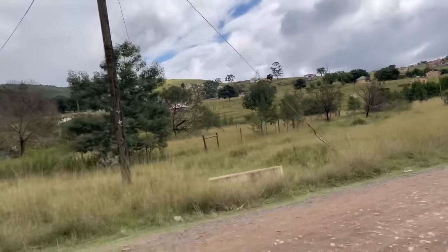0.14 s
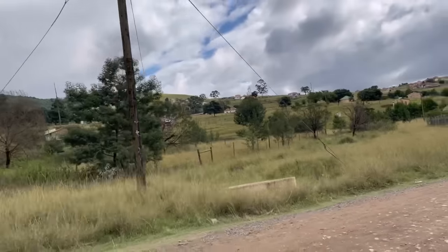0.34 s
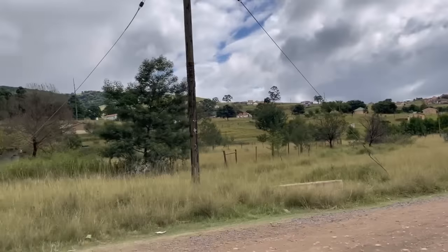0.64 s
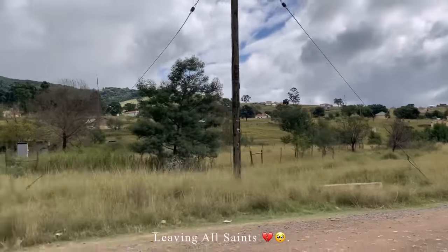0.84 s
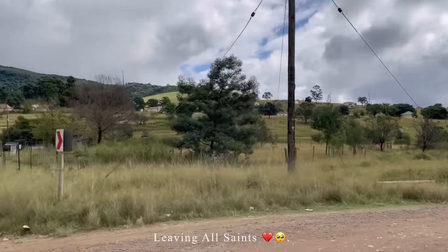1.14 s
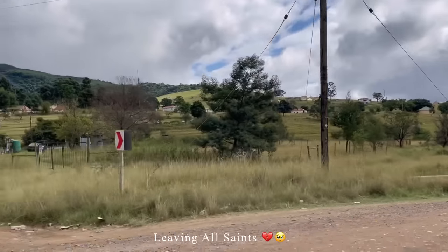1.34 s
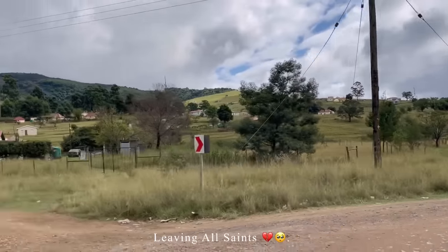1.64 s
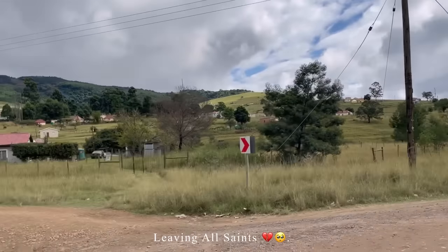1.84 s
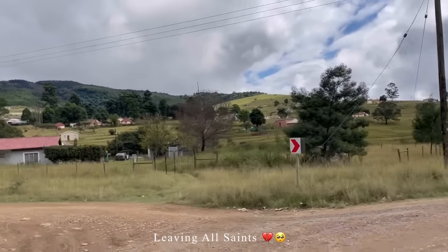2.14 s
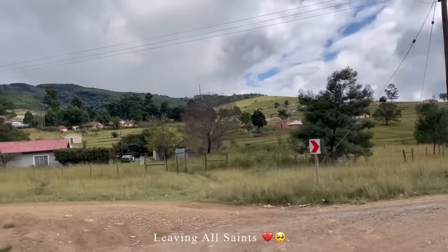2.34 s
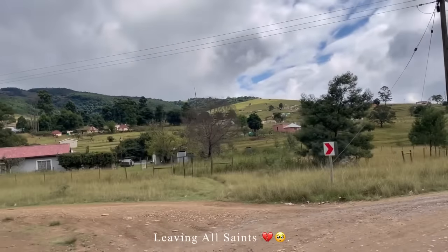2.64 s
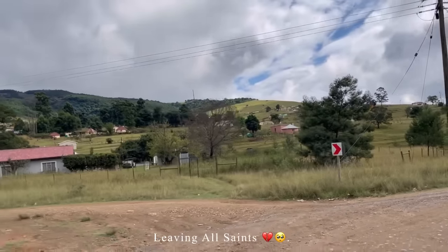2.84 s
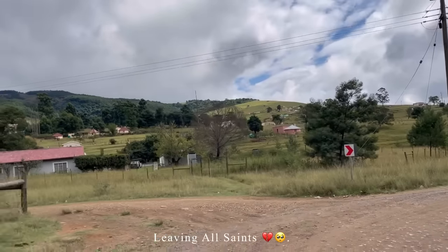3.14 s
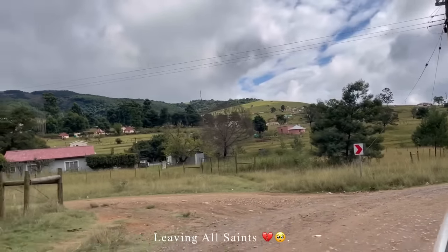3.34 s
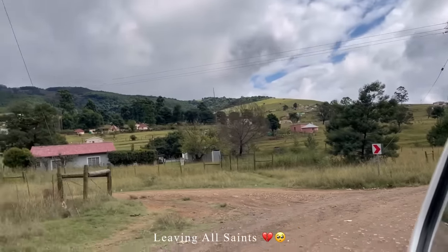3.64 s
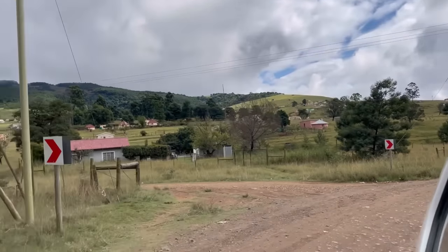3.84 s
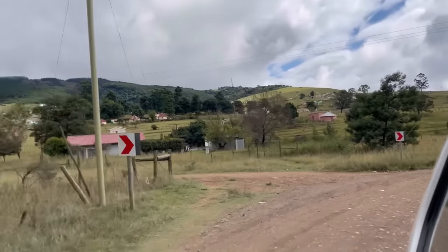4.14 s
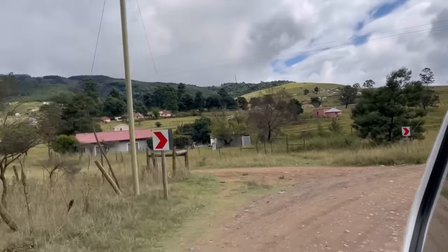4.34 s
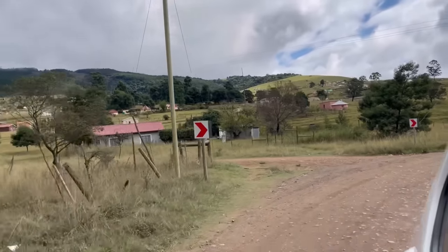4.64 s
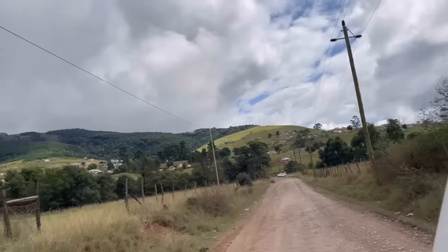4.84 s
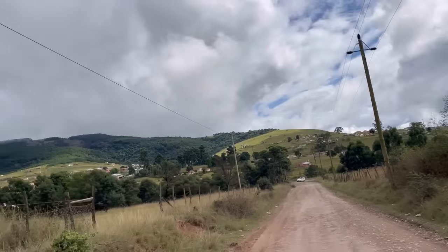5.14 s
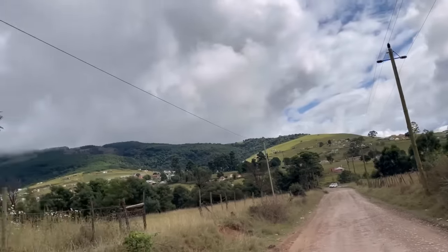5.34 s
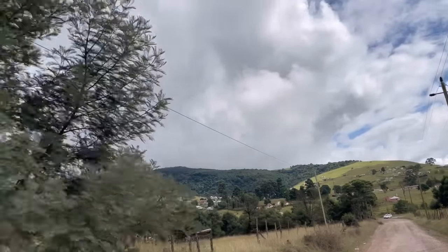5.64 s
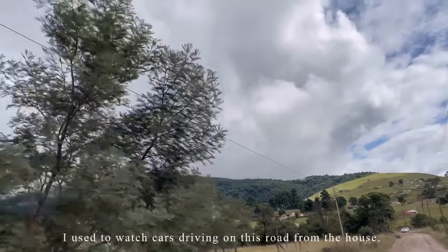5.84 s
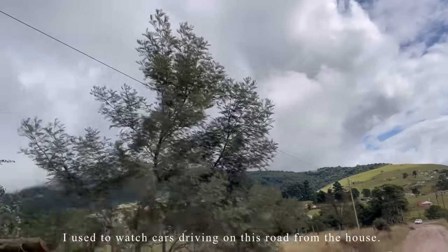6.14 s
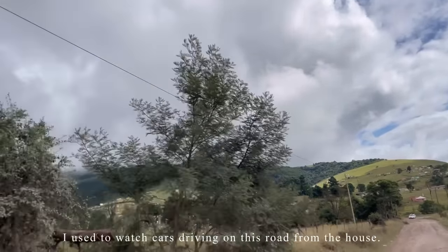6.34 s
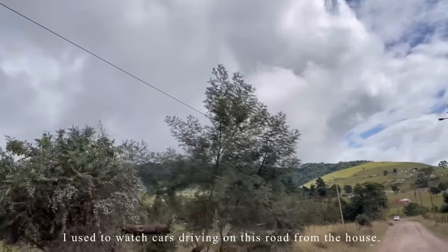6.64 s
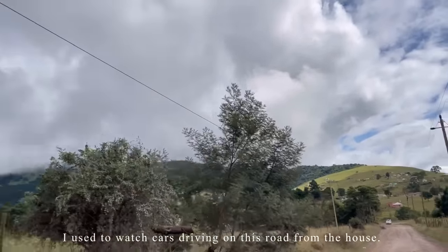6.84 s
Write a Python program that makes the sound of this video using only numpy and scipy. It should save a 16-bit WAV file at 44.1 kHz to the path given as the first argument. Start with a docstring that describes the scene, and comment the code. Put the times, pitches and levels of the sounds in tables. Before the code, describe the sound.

Heavy wind buffeting and low tyre roar on rough gravel, with body rattles, plastic creaks and, after a cut, small ticks.

```python
"""A phone at the open window of a car on gravel: filtered-noise tyre roar, pinging stones and throbbing wind throughout.
Thick round wind pops (swelling, sagging tones) crowd the first second over thin two-tone squeaks and body knocks
(noise rattles with a thud). From 1.2 s stick-slip creaks of stacked overtones join in; hard knocks land from 3.2 to 4 s.
At 4.77 s the sound cuts to a second part after a brief dip in level: lower throb, shorter rattles, less trim buzz.
A loose part then ticks (noise through a ring) among higher pops; jolted trim rings and treble spits of grit run all along."""
import sys
import numpy as np
from scipy import signal
from scipy.fft import rfft, irfft, next_fast_len
from scipy.io import wavfile
from scipy.ndimage import uniform_filter1d, map_coordinates

SR = 44100
rng = np.random.default_rng(int(sys.argv[2]) if len(sys.argv) > 2 else 0)


def file_out(sig):
    """Save sig as 16-bit WAV at sys.argv[1]."""
    # one column per channel
    cols = np.atleast_2d(sig).T
    # limit, then scale
    lim = np.clip(cols, -1, 1)
    pcm = np.round(lim * 32767).astype(np.int16)
    wavfile.write(sys.argv[1], SR, pcm)


N = 307509
LATER_S = 4.767  # the sound cuts to its second part [s]


def amp(db):
    """Decibels to linear gain."""
    return 10 ** (np.asarray(db) / 20)


def unit(x):
    """x scaled to rms 1."""
    return x / np.sqrt(np.mean(x ** 2) + 1e-20)


def along(points, hz):
    """Read (frequency [Hz], value) points on a log frequency axis."""
    f, v = np.transpose(points)
    return np.interp(np.log(hz + 1), np.log(f + 1), v)


def curves(rows):
    """One value per sample for each column after the time."""
    s, *cols = np.vstack(rows).T
    return [np.interp(np.arange(N) / SR, s, c) for c in cols]


def wobble(rate):
    """A smooth random curve, rate knots a second."""
    knots = rng.standard_normal(int(N * rate / SR) + 4)
    return map_coordinates(knots, [np.arange(N) * rate / SR])


def filtered(x, response):
    """x times a complex response of frequency."""
    m = next_fast_len(N + SR // 2)
    return irfft(rfft(x, m) * response(np.fft.rfftfreq(m, 1 / SR)), m)[..., :N]


def rush(spectrum, patchy_db, channels=1):
    """Coloured noise of rms 1 with time-frequency patches of random gain."""
    z = signal.stft(rng.standard_normal((channels, N + 512)), nperseg=512)[2]
    field = uniform_filter1d(rng.standard_normal(z.shape[1:]), size=6, axis=0)
    field = uniform_filter1d(field, size=8, axis=1)
    noise = signal.istft(z * amp(patchy_db * unit(field)), nperseg=512)[1][:, :N]
    return unit(filtered(noise, lambda hz: amp(along(spectrum, hz))))


def even(x, seconds):
    """x at rms 1 with its swells longer than this levelled out."""
    size = round(seconds * SR)
    power = uniform_filter1d(uniform_filter1d(x ** 2, size=size), size=size)
    return unit(x / np.sqrt(np.abs(power) + 1e-3 * np.mean(x ** 2)))


def add(track, s, piece):
    """Mix a piece into a track at time s."""
    part = track[..., round(s * SR):][..., :piece.shape[-1]]
    part += piece[..., :part.shape[-1]]


# phase lead of the left port: (frequency [Hz], lead [rad])
PORT_LEAD = [(0, 13), (430, -1.22), (1380, 2.5), (2150, 0.82), (4310, -0.36), (4740, 2), (6030, 7),
             (6460, 5.5), (7670, 3.5), (8870, 3), (10400, 1.5), (12700, -69.5), (13900, 6), (14200, -33)]
# likeness of the two ports for unrelated inputs: (frequency [Hz], likeness [0 to 1])
PORT_LIKENESS = [(100, 0.57), (600, 0.034), (1500, 0.55), (4000, 0.093), (9000, 0.75)]


def ports(pair):
    """Blend two signals into the two ports: partly alike, one ahead of the other in phase."""
    def turn(hz):
        return np.arccos(np.clip(along(PORT_LIKENESS, hz), 0, 1)) / 2

    def shares(hz):
        return np.array([np.cos(turn(hz)), np.sin(turn(hz))]) * np.sqrt(2)

    same, other = filtered(pair, shares)
    both = np.array([same + other, same - other]) / np.sqrt(2)
    return filtered(both, lambda hz: np.exp(.5j * np.outer([1, -1], along(PORT_LEAD, hz))))


# squeaks of a dry joint: (time [s], length [s], low tone level [dB], octave level [dB])
SQUEAK_EVENTS = [(0.187, 0.028, -39, -56), (0.27, 0.022, -42, -55), (0.296, 0.022, -42, -58),
                 (1.33, 0.027, -70, -48), (1.416, 0.046, -66, -56), (2.83, 0.022, -72, -51),
                 (3.018, 0.049, -70, -54), (3.28, 0.04, -70, -55), (3.58, 0.023, -70, -56),
                 (3.968, 0.073, -67, -51), (4.104, .04, -70, -60)]
SQUEAK_HZ = 5760


def squeaks():
    """A dry joint squeaks: a thin wavering tone and its octave."""
    out = np.zeros(N)
    phase = 2 * np.pi * np.cumsum(SQUEAK_HZ * (1 + 0.012 * wobble(200))) / SR
    for s, length, low_db, octave_db in SQUEAK_EVENTS:
        span = slice(round(s * SR), round((s + length) * SR))
        swell = np.sqrt(np.hanning(len(phase[span])))
        tone = amp(low_db) * np.sin(phase[span])
        octave = amp(octave_db) * np.sin(2 * phase[span])
        out[span] += swell * (tone + octave)
    return out


# ticks of a small loose part: (time [s], relative level [dB], pitch [Hz])
TICK_EVENTS = [(4.918, -56, 4100), (5.018, -61, 4200), (5.283, -57, 3900), (5.333, -62, 3900),
               (5.369, -53, 3940), (5.876, -55, 3700), (5.9453, -67, 3600), (6.285, -62, 4050),
               (6.324, -57.5, 3520), (6.383, -68, 3500), (6.415, -55, 3660), (6.782, -55, 3660),
               (6.84, -63, 4500), (6.875, -49.5, 3660), (6.954, -58, 3800)]


def ticks():
    """A loose part ticks: a short burst of random contact excites one broad ring."""
    out, t = np.zeros(N), np.arange(SR // 25) / SR
    short = t[:256]
    for s, db, hz in TICK_EVENTS:
        ring = unit(short * np.exp(-np.pi * 1100 * short) * np.sin(2 * np.pi * hz * short))
        contact = (1 - np.exp(-t / 0.00033)) * amp(-60 * t / 0.043) * rng.standard_normal(len(t))
        add(out, s, amp(db) * np.convolve(contact, ring))
    return out


# creaks of a plastic joint: (time [s], length [s], relative level [dB], loudest pitch [Hz])
CREAK_EVENTS = [(1.257, 0.033, -43, 3700), (1.894, 0.016, -38, 4120), (2.193, 0.029, -41, 3680),
                (2.423, 0.024, -31.5, 2140), (2.612, 0.017, -34, 3560), (2.632, .015, -40, 2800),
                (2.685, 0.052, -35.5, 1970), (3.545, 0.018, -38, 3400), (3.597, 0.023, -32, 1850),
                (3.857, .018, -35, 1850), (4.022, 0.028, -32, 3750), (4.113, .015, -46, 3500),
                (4.99, 0.02, -30.5, 1370), (5.239, 0.028, -34, 1850)]
CREAK_HZ, CREAK_OCTAVES = 909, 0.29  # slip rate; width of the loud overtones
ODD_DB = -3  # odd overtones are weaker


def creaks():
    """Quick stick-slip of a plastic joint: a short stack of overtones, loudest around one pitch."""
    out, k = np.zeros(N), np.arange(1, 8)[:, None]
    draws = rng.standard_normal((len(CREAK_EVENTS), len(k), 2))
    for (s, length, db, top_hz), draw in zip(CREAK_EVENTS, draws):
        t = np.arange(round(length * SR)) / SR
        octaves_off = np.log2(k * CREAK_HZ / top_hz)
        uneven = amp(ODD_DB * (k % 2) + 1.4 * draw[:, :1])
        weight = np.exp(-.5 * (octaves_off / CREAK_OCTAVES) ** 2) * uneven
        stack = np.sum(weight * np.sin(2 * np.pi * k * CREAK_HZ * t + np.pi * draw[:, 1:]), axis=0)
        add(out, s, amp(db) * np.hanning(len(t)) * unit(stack))
    return ports(np.array([out, out / 2]))


# thin spits of grit: (time [s], level [dB])
SPIT_EVENTS = [(0.235, -27), (0.7084, -40), (0.8104, -39), (0.944, -40), (1.4616, -37), (2.37, -35),
               (2.616, -33), (2.727, -36), (3.013, -31.5), (3.1233, -36), (3.331, -30.5), (3.5169, -40),
               (3.6581, -35), (3.8906, -41), (3.938, -33), (3.9833, -39), (4.334, -37), (4.918, -39.5),
               (5.3587, -39), (5.4939, -44)]
SMALL_SPIT_DB, SMALL_SPIT_SPREAD_DB = 0, 6  # chance specks: over the crunch; up to this much either way


def spits():
    """Single specks of grit flick against the bodywork: very short and all treble."""
    level, t = np.zeros(N), np.arange(SR // 50) / SR
    crunch_db = curves(ROAD_LEVELS)[1]
    small = []
    for u, v in rng.random(size=(25, 2)):
        speck_db = crunch_db[int(u * N)] + SMALL_SPIT_DB + SMALL_SPIT_SPREAD_DB * 2 * (v - .5)
        small.append((u * N / SR, speck_db))
    for s, db in SPIT_EVENTS + small:
        add(level, s, amp(db - 60 * t / 0.019) * (1 - np.exp(-t / 0.00059)))
    treble = [(6000, -30), (8800, 3), (12500, -9), (14500, -15)]  # (frequency [Hz], relative level [dB])
    return level * ports(rush(treble, patchy_db=2, channels=2))


# ringing modes of loose cabin trim: (frequency [Hz], width [Hz], relative level [dB])
TRIM_MODES = [(820, 70, 2), (1900, 90, 1), (2300, 110, -1), (3100, 140, -8), (3730, 120, -5),
              (4600, 160, -9), (6200, 250, -17)]


def trim(clumps):
    """Small shocks in clumps set the trim ringing; each mode takes its own random shocks."""
    out = np.zeros((2, N))
    for centre, width, db in TRIM_MODES:
        draw = rng.random((2, 2, N))
        struck = draw[0] < 45 / SR * amp(5 * clumps)
        shocks = struck * amp(-3.5 * np.log(draw[1] + .02))
        ring = filtered(shocks, lambda f: 1j * f * width / (centre ** 2 - f * f + 1j * f * width))
        out += amp(db) * unit(ring)
    return unit(out)


# small jolts that shake the trim: (time [s], peak before the ports [dB], favoured pitch [Hz])
TRIM_JOLTS = [(0.238, -22, 2220), (0.322, -22, 3600), (0.474, -17, 2260), (0.64, -20, 2300),
              (0.729, -21, 2300), (0.758, -26, 2300), (1.3295, -34, 1920), (1.412, -31, 1890),
              (1.441, -25, 2000), (1.716, -32, 2300), (1.8, -32, 2200), (1.8148, -25, 2680),
              (1.8797, -29, 2900), (1.919, -26, 2330), (1.942, -30, 3100), (1.977, -25.5, 2100),
              (2.042, -30, 3300), (2.1122, -31, 2160), (2.13, -30, 2600), (2.3728, -23, 1700),
              (2.4893, -29.5, 3500), (2.5238, -26.5, 2620), (2.545, -33, 2700), (2.6006, -34, 2040),
              (2.645, -29, 2800), (2.737, -37, 2000), (2.7743, -37, 1980), (2.835, -34, 2400),
              (2.856, -24.5, 3200), (2.905, -26, 2300), (2.919, -29, 2800), (3.015, -28, 3000),
              (3.0641, -31, 2400), (3.1217, -32, 3640), (3.25, -15, 2300), (3.346, -15, 1710),
              (3.8054, -35, 1850), (3.821, -44, 4000), (3.916, -35, 1700), (4.0673, -22, 2240),
              (4.084, -28, 2300), (4.29, -41, 2100), (4.5195, -29, 2120), (4.634, -23, 2400),
              (4.797, -30, 2300), (4.909, -32, 1900), (4.944, -25, 1800), (5.064, -34, 1900),
              (5.098, -29, 2300), (5.435, -35, 2400), (5.6, -40, 3700), (5.632, -49, 4600),
              (6.057, -43, 3300), (6.093, -36, 4200), (6.228, -35, 3700), (6.287, -41, 5000),
              (6.38, -24, 5000), (6.54, -32, 3500), (6.752, -34, 4200), (6.85, -31, 5000)]
SHAKE_T60, SHAKE_OCTAVES = 0.076, 0.4  # decay of the push [s]; how far from its pitch the trim answers


def shakes():
    """A short ragged push rings those modes of the trim that lie near its pitch."""
    out, t = np.zeros((2, N)), np.arange(SR // 16) / SR
    centre, width, mode_db = np.transpose(TRIM_MODES)[..., None]
    modes = amp(mode_db) * np.exp(-np.pi * 1.6 * width * t) * np.sin(2 * np.pi * centre * t)
    draws = rng.standard_normal((len(TRIM_JOLTS), 2, len(t)))
    for (s, db, hz), draw in zip(TRIM_JOLTS, draws):
        nearness = np.exp(-.5 * (np.log2(centre / hz) / SHAKE_OCTAVES) ** 2)
        ring = np.sum(modes * nearness, axis=0)
        push = draw * (1 - np.exp(-t / 0.00081)) * amp(-60 * t / SHAKE_T60)
        piece = signal.fftconvolve(push, ring[None], axes=1)
        add(out, s - .001, amp(db) * piece / np.abs(piece).max())
    return out


def stones(clumps, centre_hz, cycles, spread_db, count):
    """Small damped pings, denser where the gravel lies in clumps; many small, a few big."""
    draw = rng.random((count, 4))
    density = np.cumsum(amp(clumps))
    start = np.searchsorted(density, draw[:, 0] * density[-1])
    hz = np.clip(centre_hz * np.exp(0.662 * rng.standard_normal(count)), 700, 14000)[:, None]
    turns = np.arange(512) / SR * hz
    size = amp(-spread_db * np.log(draw[:, 1:2] + 0.006)) * np.sqrt(hz)
    pings = size * np.exp(-turns / cycles) * np.sin(2 * np.pi * turns)
    pings = pings * np.cos(np.linspace(0, np.pi / 2, num=512))  # fade to silence
    # both channels lie end to end; each stone falls in one of them
    channel_start = (draw[:, 2] < .5) * (N + 512)
    where = (start + channel_start)[:, None] + np.arange(512)
    return unit(np.bincount(where.ravel(), pings.ravel(), 2 * (N + 512)).reshape(2, -1)[:, :N])


# road: (time [s], tyre roar level [dB], gravel crunch level [dB])
ROAD_LEVELS = [(0.0, -30.5, -40.5), (0.5, -36, -41.5), (0.65, -28, -40.5), (0.78, -32.5, -46),
               (1.26, -35.5, -43), (1.56, -32.5, -44.5), (2.53, -34, -44.5), (2.82, -32, -41),
               (3.96, -30, -38.5), (4.63, -33, -41), (4.76, -28.5, -39), (4.77, -34.5, -50.5),
               (4.9, -30.5, -41), (5.2, -30, -40.5), (5.47, -32.5, -40), (5.7, -31, -43.5),
               (5.93, -34.5, -41), (6.1, -34, -47), (6.5, -29, -41), (6.97, -28, -43)]
# roar off to the sides: (time [s], body level [dB], deep part level [dB])
FLANK_LEVELS = [(0, -29.5, -24), (.7, -23.5, -23), (1.3, -35.5, -37.5), (2.9, -32, -35), (3.3, -30, -33),
                (4.3, -27, -23), (4.76, -31, -33), (4.78, -41, -34), (5.5, -42, -34), (6, -39.5, -49),
                (6.97, -35, -73)]
# colours of tyre roar, crunch, side roar and its deep part: (frequency [Hz], relative level [dB per Hz])
ROAR_COLOUR = [(180, -19.5), (300, -4), (408, -5.5), (772, -5), (847, -9), (1370, -14), (1810, -18.5),
               (3500, -41.5), (4550, -41), (7700, -120)]
CRUNCH_COLOUR = [(880, -19), (1500, -11.5), (2190, -3.5), (4510, -8), (5600, -11), (6460, -11), (7590, -14),
                 (8340, -70), (8750, -19), (9350, -16.5), (12000, -23), (13700, -31), (14500, -75)]
SIDE_COLOUR = [(76, -45), (130, -5), (184, 4), (322, -3.5), (366, -7), (900, -15), (1170, -41),
               (1980, -120)]
DEEP_COLOUR = [(15, -26), (30, -10), (59, 9), (150, 7), (200, -38), (330, -120)]
LATER_BUZZ_DB = -23  # change of the trim buzz in the second part


def road():
    """Tyre roar in the cabin, stones cracking under the tread and the trim buzzing along."""
    roar_db, crunch_db = curves(ROAD_LEVELS)
    sides_db, deep_db = curves(FLANK_LEVELS)
    clumps = wobble(35)
    roar_swell = amp(roar_db + 0.5 * clumps + 1.5 * wobble(60))
    roar = roar_swell * rush(ROAR_COLOUR, patchy_db=1.8, channels=2)
    hiss = amp(2.3 * clumps) * rush(CRUNCH_COLOUR, patchy_db=1.9, channels=2)
    grit = stones(5.5 * clumps, centre_hz=2800, cycles=5, spread_db=2.8, count=3600)
    grit = unit(filtered(grit, lambda hz: amp(along(CRUNCH_COLOUR, hz))))
    later_db = np.where(np.arange(N) < LATER_S * SR, 0, LATER_BUZZ_DB)
    buzz = 1.35 * amp(later_db) * trim(clumps)
    crunch = amp(crunch_db) * unit(hiss + 0.8 * grit + buzz)
    sides = amp(sides_db + 0.79 * wobble(25)) * rush(SIDE_COLOUR, patchy_db=0.5)[0]
    sides = sides + amp(deep_db) * rush(DEEP_COLOUR, patchy_db=2.5)[0]
    # the side roar is opposite pressure on the two ports
    return ports(roar + crunch + shakes()) + sides * [[1], [-1]]


# knocks and rattles of the body: (time [s], nominal peak [dB], brightness [dB])
KNOCK_EVENTS = [(0.0655, -24, -13), (0.217, -23, 0), (0.2367, -13, -1.5), (0.253, -26, -16),
                (0.321, -25, -4), (0.459, -20, -12), (0.4724, -11, -20), (0.541, -23.5, -3),
                (0.562, -23, -4), (0.62, -21.5, -8.5), (0.639, -19.5, -41), (0.716, -21, -4),
                (0.802, -17, -10.5), (0.939, -24.5, -6), (1.425, -22.5, -8), (1.572, -24, -9),
                (1.669, -18.5, -22), (1.9006, -26.5, -1), (2.084, -25, -13), (2.159, -21, -36),
                (2.368, -13.5, -11), (2.6167, -24, -3.5), (2.695, -29, -28), (2.803, -24, -6.5),
                (2.969, -25, -12), (3.2477, -9.5, -11.5), (3.337, -21, 2), (3.343, -9.5, -9),
                (3.354, -26, -16), (3.5515, -20, -15), (3.5847, -16.5, -40), (3.8641, -32, -14),
                (3.914, -9, -6), (4.027, -15.5, -12), (4.065, -18, -13), (4.272, -20.5, -39),
                (4.599, -14, -12), (4.69, -26, -7), (4.994, -24, -18), (5.275, -24.5, -22),
                (5.3203, -25, -23), (5.355, -20, -24), (5.405, -15, -28), (5.4964, -38.5, 10),
                (5.94, -20.5, -23), (6.173, -23.5, -32), (6.6953, -29, -13)]
# colours of the panels and of the hollow thud of the body: (frequency [Hz], relative level [dB per Hz])
PANEL_COLOUR = [(350, 14), (600, 7.5), (837, -1.5), (1500, -2.5), (1840, -10.5), (2560, -10), (4190, -19.5),
                (6250, -22), (8160, -33), (10400, -38), (14500, -44)]
THUD_COLOUR = [(120, -45), (190, 9.5), (270, -8.5), (365, 8.5), (450, -22), (700, -50), (1100, -53.5)]
RATTLE_T60, LATER_T60 = 0.15, 0.078  # decay of the duller rattle, in the first and second part [s]
RATTLE_CREST_DB = 7  # nominal peak of a rattle over its rms
THUD_DB, THUD_GROWS = -5, 0.65  # offset of the thud for a -26.5 dB knock; extra dB for each dB of knock
CLATTER_DB, CLATTER_RATE, CLATTER_S = 3.2, 170, 0.005  # uneven contacts: depth, knots per second, onset [s]


def knocks():
    """Each jolt shakes the panels: a quick rise, a ragged rattle whose treble dies first, and the body's thud."""
    low, high, body, t = np.zeros(N), np.zeros(N), np.zeros(N), np.arange(SR // 5) / SR
    uneven = np.pad(wobble(CLATTER_RATE), (0, len(t)))
    for s, db, bright_db in KNOCK_EVENTS:
        t60 = RATTLE_T60 if s < LATER_S else LATER_T60
        start = (1 - np.exp(-t / 0.0013)) ** 2 * amp(db - RATTLE_CREST_DB)
        start = start * ((s > LATER_S) | (s + t < LATER_S))  # earlier knocks are cut off at LATER_S
        contacts = uneven[round(s * SR):][:len(t)]
        tail = amp(CLATTER_DB * contacts * np.clip(t / CLATTER_S - 1, 0, 1))
        dull_fall = tail * amp(-60 * t / t60) + 0.98 * amp(-60 * t / 0.016)
        bright_fall = 0.4 * tail * amp(-60 * t / (0.8 * t60)) + 2.1 * amp(-60 * t / 0.022)
        thud_fall = amp(THUD_DB + THUD_GROWS * (db + 26.5) - 60 * t / 0.16) * (1 - np.exp(-t / 0.001))
        add(low, s, start * dull_fall)
        add(high, s, start * amp(bright_db) * bright_fall)
        add(body, s, start * thud_fall)

    def share(hz):  # the part below about 2800 Hz
        return 1 / (1 + (hz / 2800) ** 4)

    def above(hz):  # leaves the bottom to the thud
        return hz ** 4 / (hz ** 4 + 650 ** 4)

    shake = rush(PANEL_COLOUR, patchy_db=2.5, channels=2) * amp(3 * wobble(250))
    dull = even(ports(filtered(shake, lambda hz: share(hz) * above(hz))), .006)
    bright = even(ports(filtered(shake, lambda hz: 1 - share(hz))), .006)
    thud = even(rush(THUD_COLOUR, patchy_db=0, channels=2), .012)
    return low * dull + high * bright + body * ports(thud)


# wind pops on the ports: (time [s], nominal peak [dB], nominal pitch [Hz])
POP_EVENTS = [(0.222, -18, 260), (0.252, -11, 403), (0.355, -30, 230), (0.459, -12.5, 520),
              (0.509, -11.5, 417), (0.621, -10, 330), (0.64, -10, 385), (0.684, -11.5, 300),
              (0.708, -6.5, 500), (0.729, -6.5, 298), (0.744, -3.5, 362), (0.769, -2, 552),
              (0.776, -13, 198), (0.802, -9, 414), (0.94, -10, 495), (0.945, -4, 542), (0.951, -25, 165),
              (1.052, -19, 317), (1.198, -17.5, 324), (1.252, -8.5, 510), (1.358, -20, 445),
              (1.428, -13.5, 383), (1.452, -17.5, 454), (1.489, -14, 390), (1.568, -16.5, 425),
              (1.67, -18, 372), (1.732, -13.5, 458), (1.785, -18, 447), (1.866, -21, 450),
              (1.963, -16.5, 238), (1.997, -19, 259), (2.153, -16, 513), (2.204, -13.5, 450),
              (2.227, -14, 302), (2.261, -12, 423), (2.307, -16, 427), (2.546, -16.5, 330),
              (2.559, -9.5, 476), (2.582, -13, 510), (2.876, -16.5, 370), (2.909, -19, 458),
              (3.25, -25, 610), (3.264, -19, 302), (3.358, -9, 316), (3.918, -24, 350), (3.987, -17, 260),
              (4.013, -11, 273), (4.127, -14.5, 197), (4.174, -14, 237), (4.194, -12.5, 262),
              (4.284, -12.5, 354), (4.704, -13.5, 264), (4.724, -17, 252), (4.756, -15.5, 380),
              (4.871, -13.5, 370), (4.918, -16, 534), (5.022, -18.5, 400), (5.043, -24, 500),
              (5.058, -15.5, 636), (5.075, -22, 446), (5.157, -21, 770), (5.189, -25, 790),
              (5.21, -18, 780), (5.219, -17, 700), (5.238, -19.5, 800), (5.256, -26, 815),
              (5.276, -22, 820), (5.297, -16.5, 660), (5.322, -17, 716), (5.355, -16, 860),
              (5.362, -18.5, 590), (5.408, -11.5, 890), (5.496, -24.5, 675), (5.575, -22.5, 730),
              (5.675, -27, 716), (5.749, -30, 520), (5.79, -26, 372), (5.862, -23, 705), (5.9, -22.5, 620),
              (5.948, -29, 403), (6.039, -28, 297), (6.092, -31, 445), (6.148, -25, 327),
              (6.45, -16.5, 390)]
# each pop is a core, a slower push under it and a quick edge: (ratio to nominal pitch, level [dB])
POP_LAYERS = [(1.024, -1.5), (0.405, -6), (1.97, -23)]
# churned air behind a pop: (frequency [Hz], relative level [dB per Hz])
WAKE_COLOUR = [(120, -25), (220, 5.5), (450, -2), (750, -14.5), (1200, -43), (2000, -120)]
SMALL_POPS, SMALL_POP_DB, SMALL_POP_HZ = 14, 4, 430  # chance pops: count, dB over the gust, base pitch
WAKE_DB, WAKE_RISE_S, WAKE_T60 = -12, 0.0039, 0.095  # offset from the pop; rise; decay [s]


def wind_pops(gust_db):
    """A passing eddy pops on the port: a round swelling tone, then a wake of churned air."""
    small = []
    for u, v in rng.random((SMALL_POPS, 2)):
        small.append((u * N / SR, gust_db[int(u * N)] + SMALL_POP_DB, SMALL_POP_HZ * (0.58 + 1.04 * v)))
    events = POP_EVENTS + small
    pops, wake, t = np.zeros(N), np.zeros(N), np.arange(SR // 20) / SR
    ratio, part_db = np.transpose(POP_LAYERS)[..., None]
    phases = rng.uniform(0, 2 * np.pi, (len(events), len(ratio), 1))
    for (s, db, hz), phase in zip(events, phases):
        cycles = t * hz * ratio
        swell = (.75 * cycles) ** 2 * np.exp(2 - 2 * .75 * cycles)
        fall = 1.263 * cycles - 0.084 * cycles ** 2  # the pitch sags as the eddy passes
        layers = amp(db + part_db) * swell * np.cos(2 * np.pi * fall + phase)
        add(pops, s, np.sum(layers, axis=0))
        add(wake, s, amp(db + WAKE_DB - 60 * t / WAKE_T60) * (1 - np.exp(-t / WAKE_RISE_S)))
    pops = pops + wake * even(rush(WAKE_COLOUR, patchy_db=1.5)[0], 0.049)
    return pops * amp(1.8 * wobble(220))  # random flutter


# wind: (time [s], throb level [dB], gust body level [dB])
WIND_LEVELS = [(0.0, -40, -11.5), (0.05, -16, -21), (0.6, -15, -16), (0.76, -15, -12), (0.85, -14, -19),
               (1.11, -19.5, -15.5), (1.18, -28.5, -32), (1.27, -25, -25.5), (1.29, -34, -27.5),
               (1.51, -21, -26.5), (1.62, -35.5, -32), (1.67, -27, -24), (2.74, -24, -28),
               (3.9, -23.5, -21.5), (4.2, -24.5, -21), (4.36, -24, -19.5), (4.49, -23, -25),
               (4.76, -31, -23), (4.77, -21, -27), (5.1, -22, -27), (5.2, -16, -25.5), (5.36, -20.5, -27.5),
               (5.385, -24, -34), (5.57, -31, -29), (5.6, -21, -42), (5.82, -31.5, -35), (6.58, -24, -24),
               (6.69, -27, -27.5), (6.97, -30.5, -25)]
# rasp at the port edge: (time [s], level [dB])
RASP_LEVELS = [(0, -52), (.45, -47), (.75, -44), (.9, -44), (1.1, -45), (1.2, -61), (4.9, -54), (5.04, -40),
               (5.16, -38), (5.3, -33), (5.365, -34), (5.375, -56), (6.97, -65)]
# lean of the wind to the left: (time [s], left over right [dB])
WIND_LEAN = [(0, -2.5), (.6, 2), (2.7, 3), (3.3, 3), (4.2, -1), (4.76, 2.5), (4.78, 3), (6.97, 1)]
# colours of throb, gust and rasp: (frequency [Hz], relative level [dB per Hz])
THROB_COLOUR = [(12, -49), (20, -41), (36, -7.5), (58, 2), (110, -6), (140, -5), (240, -120)]
GUST_COLOUR = [(50, -8), (85, -1), (200, -1.5), (275, -6.5), (360, -11), (415, -15), (545, -20.5),
               (800, -40.5), (1040, -70), (1760, -120)]
RASP_SPECTRUM = [(200, -34), (450, 5.5), (800, -8), (1300, -4.5), (1900, -20), (3000, -40), (6000, -120)]
THROB_LUMPS_DB, GUST_LUMPS_DB = 2.5, 1.5  # random swells, a dozen knots a second
LATER_HZ = 111  # the throb sits below this pitch in the second part
RASP_DEPTH_DB = 5  # gain of the rasp per rms of trough


def wind():
    """Eddies at the window edge press on both ports together: a throb, lumpy gusts, a rasp and single pops."""
    throb_db, gust_db = curves(WIND_LEVELS)
    eddy = rush(THROB_COLOUR, patchy_db=-0.2)[0]
    deeper = unit(filtered(eddy, lambda hz: 1 / (1 + (hz / LATER_HZ) ** 4)))
    eddy = np.where(np.arange(N) < LATER_S * SR, eddy, deeper)
    throb = amp(throb_db) * unit(amp(THROB_LUMPS_DB * wobble(12)) * even(eddy, 0.063))
    gust = even(amp(3.9 * wobble(60)) * rush(GUST_COLOUR, patchy_db=4.5)[0], 0.036)
    gust = amp(gust_db) * unit(amp(GUST_LUMPS_DB * wobble(12)) * gust)
    # the air rasps at the port edge in the troughs of the throb
    troughs = amp(RASP_DEPTH_DB * np.clip(-even(eddy, 0.067), -2, 2))
    rasp = troughs * amp(2.2 * wobble(200)) * rush(RASP_SPECTRUM, patchy_db=1.5)[0]
    rasp = amp(curves(RASP_LEVELS)[0]) * unit(rasp)
    air = throb + gust + rasp + wind_pops(gust_db)
    return air * amp(np.outer([.5, -.5], curves(WIND_LEAN)[0]))


DIP_S, DIP_DB = 0.012, -16  # length and depth of the level dip at LATER_S


def scene():
    """All layers together; the level dips briefly at the cut between the two parts."""
    since = np.arange(N) / SR - LATER_S
    dip = amp(DIP_DB * (since > 0) * np.clip(2 - since / DIP_S * 2, 0, 1))
    return dip * (squeaks() + ticks() + creaks() + spits() + road() + knocks() + wind())


# colour of the ports: (frequency [Hz], left over right [dB])
PORT_TILT = [(60, -1), (230, -3), (920, -2.5), (3580, -0.5), (14000, 0)]
TOP_HZ = 14600  # band limit


def record(dry):
    """The ports differ a little in colour; loud peaks saturate softly; nothing passes above the band limit."""
    heard = filtered(dry, lambda hz: amp(np.outer([.5, -.5], along(PORT_TILT, hz))))
    held = heard / (1 + np.abs(heard / .95) ** 6) ** (1 / 6)
    return filtered(held, lambda hz: hz < TOP_HZ)


dry = scene()
out = record(dry)
file_out(out)
```